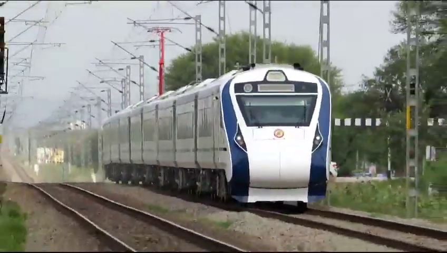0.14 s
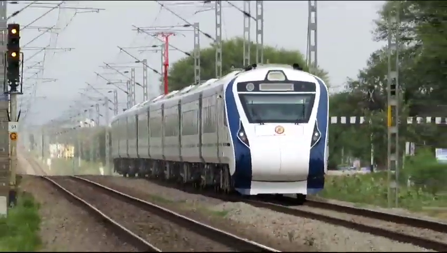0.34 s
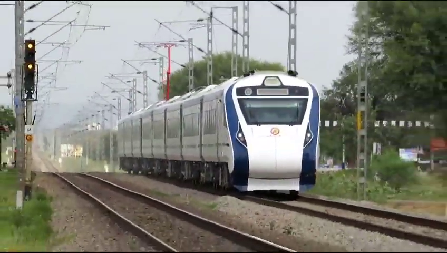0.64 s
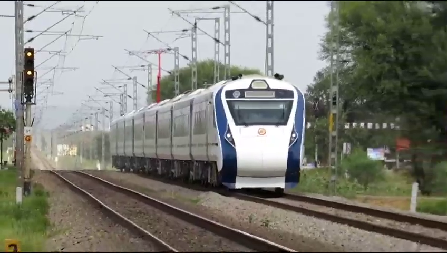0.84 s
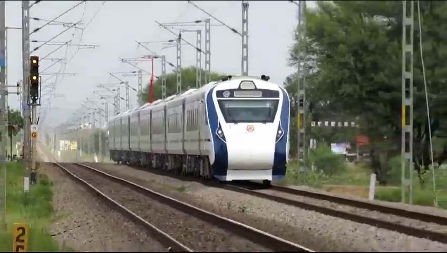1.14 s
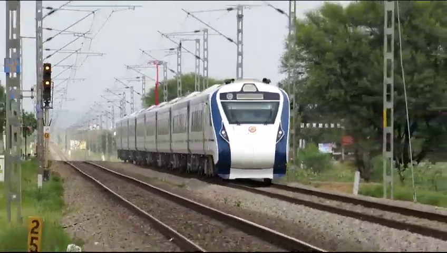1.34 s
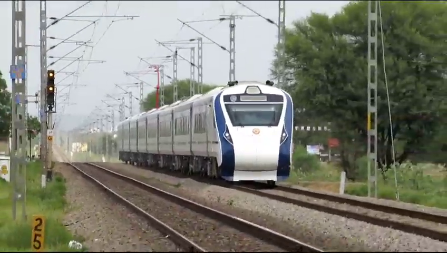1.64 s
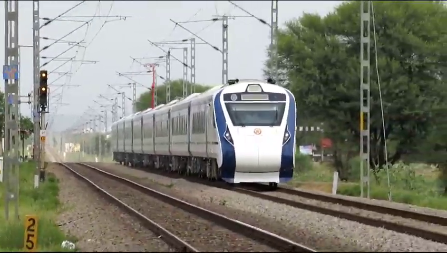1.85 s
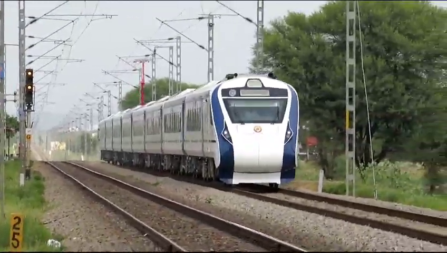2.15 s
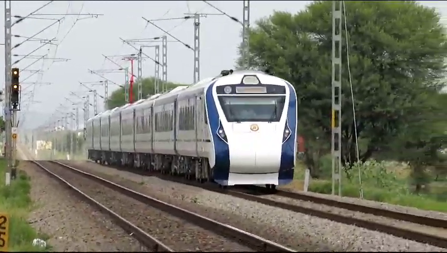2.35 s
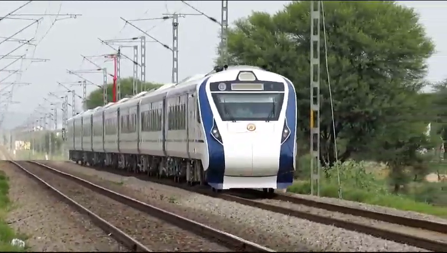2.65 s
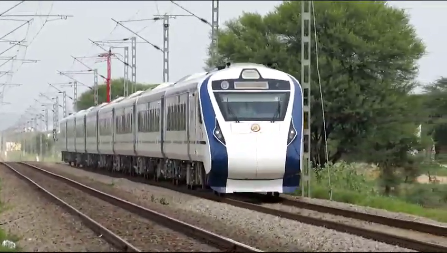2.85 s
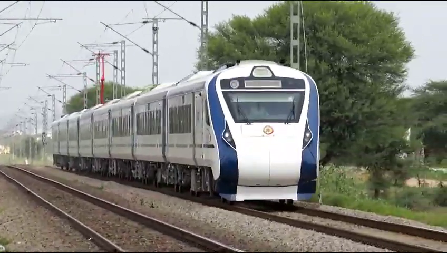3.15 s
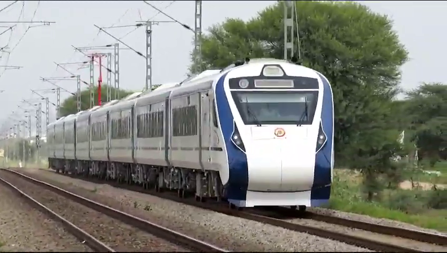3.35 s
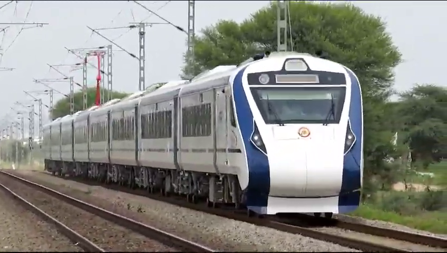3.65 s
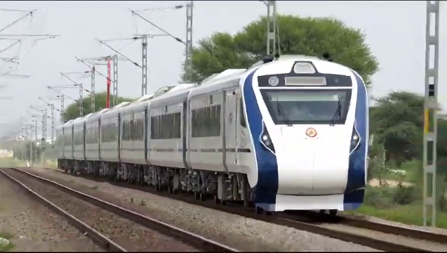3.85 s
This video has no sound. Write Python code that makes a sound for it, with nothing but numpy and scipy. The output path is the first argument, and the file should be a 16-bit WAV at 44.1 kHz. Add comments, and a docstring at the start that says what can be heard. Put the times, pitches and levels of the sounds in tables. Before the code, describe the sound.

A train horn blasts one steady high note from about two seconds to the end, after quieter ringing rails, soft rolling noise and wind buffets; open track outdoors, stereo microphone exposed to wind.

```python
"""One long air-horn note from a fast train approaching on open track: drifting, shimmering harmonics.
Masts beside the line return delayed copies that slide down in pitch as the train passes them.
The rails sing (noise through narrow resonances) over the coloured noise of rolling;
a far horn hums on two sines, gusts of low noise buffet two microphone ports, faint air noise lies below."""
import sys
import numpy as np
from scipy import signal
from scipy.fft import rfft, irfft
from scipy.io import wavfile

SR = 44100
rng = np.random.default_rng(int(sys.argv[2]) if len(sys.argv) > 2 else 0)


def nominal_scale(level):
    """Amplitude ratio for a level in decibels (scalar or array-like)."""
    x = np.asarray(level, float) / 20
    return 10 ** x


def transcribe(u):
    """Save the signal u as a 16-bit wav file named by the first command-line argument.

    u: samples, shape (n,) or (channels, n), limited to [-1, 1]; the rate is SR.
    q: integer samples, one column per channel.
    """
    v = np.clip(np.atleast_2d(u).T, -1, 1)
    q = np.round(v * 32767).astype(np.int16)
    wavfile.write(sys.argv[1], SR, q)


N = 176400

# horn pitch, high while the air pressure is low: time_s, pitch_hz
HORN_PITCH = [(2.05, 775), (2.07, 775), (2.1, 769.5), (2.13, 762.5), (2.17, 755.5), (2.22, 751.6),
              (2.32, 748.4), (2.5, 745.5), (2.9, 744.2), (3.3, 743.9), (3.7, 743.3), (3.8, 743.7),
              (3.85, 749.2), (3.9, 758), (3.94, 764), (3.99, 779)]
# horn's lower partials: time_s, partial_1_db, partial_2_db, partial_3_db, partial_4_db
HORN_LOWER = [(2.045, -39, -48, -61, -65), (2.065, -14, -43.5, -35.5, -43), (2.093, -14, -29, -23.5, -59),
              (2.115, -13.5, -26.5, -19.5, -38), (2.159, -16, -40, -17.5, -30.5),
              (2.197, -14.5, -29, -16.5, -46), (2.245, -15, -24, -21, -27), (2.337, -14, -20, -28.5, -30.5),
              (2.397, -11.5, -26, -25.5, -25), (2.429, -16.5, -24, -31, -21.5),
              (2.527, -13.5, -19, -23.5, -23), (2.653, -17.5, -24, -19, -23.5),
              (2.695, -16.5, -26.5, -21.5, -26), (2.771, -15.5, -19.5, -25.5, -25.5),
              (2.859, -15, -20, -21, -28), (2.907, -16.5, -20, -31, -30.5), (2.945, -20.5, -18, -24, -22),
              (2.989, -15, -19, -25, -27.5), (3.109, -18, -25, -21, -20.5), (3.239, -15, -27, -20.5, -26.5),
              (3.315, -14, -35, -32, -22.5), (3.397, -12.5, -25.5, -24, -21.5),
              (3.461, -10.5, -27, -34, -21), (3.537, -12, -24, -31, -29.5), (3.593, -13, -25, -40.5, -33),
              (3.625, -10, -19.5, -36, -40), (3.663, -10.5, -21, -26, -57), (3.739, -11.5, -18, -24, -22),
              (3.831, -14, -24, -19.5, -28.5), (3.917, -17.5, -28.5, -29.5, -28.5),
              (3.961, -23.5, -40, -29.5, -34), (3.995, -45, -47, -37, -47)]
# common level of the horn's upper partials: time_s, partials_5_to_9_db, partials_10_to_20_db
HORN_UPPER = [(2.045, -75, -83), (2.055, -52, -86), (2.115, -26, -45.5), (2.185, -30, -53),
              (2.201, -31.5, -53), (2.239, -28, -51), (2.255, -33, -49), (2.349, -29, -52),
              (2.397, -29, -47.5), (2.561, -35.5, -54), (2.593, -29, -49), (2.631, -34.5, -55.5),
              (2.739, -26, -47.5), (2.979, -31.5, -45), (3.043, -36, -47), (3.207, -27.5, -44),
              (3.223, -29, -47.5), (3.337, -32, -46), (3.429, -27, -38), (3.635, -29, -42.5),
              (3.723, -32.5, -48.5), (3.815, -26, -44), (3.859, -36, -56), (3.995, -42, -82)]
# upper partials relative to that level: multiple, relative_db
UPPER_PARTIALS = [(5, -4), (6, -7), (7, -6.5), (8, -15), (9, -15), (10, -5.5), (11, -6.5), (12, -14),
                  (13, -13.5), (14, -15), (15, -21.5), (16, -24.5), (17, -27), (18, -28.5), (19, -37),
                  (20, -36)]
# horn's stereo side: frequency_hz, side_re_mid_db
HORN_SIDE = [(700, -38), (1500, -24.5), (2300, -22), (4000, -19), (8000, -8.5), (14000, -9.5)]
WAVER_RATIO, WAVER_HZ = 0.00037, 19
SHIMMER_DB, SHIMMER_HZ, SHIMMER_EXPONENT = -24, 23.5, 0.78
FADING_DB, FADING_HZ = 4, 6.6
RELEASE_S, DULLING_DB_PER_S_PER_PARTIAL = 3.88, 22

# masts that the horn passes: pass_s, distance_from_track_m, echo_db
MASTS = [(2.33, 3.0, -30), (2.62, 5.1, -34.5), (2.97, 6.5, -29), (3.3, 3, -41)]
TRAIN_M_PER_S, SOUND_M_PER_S = 28, 343
CLUTTER_COUNT, CLUTTER_MIN_DB, NEAR_CUT_HZ = 12, -40, 1630
# trees and walls still ahead of the train
DISTANT_COUNT, DISTANT_MIN_DB, DISTANT_CUT_HZ = 8, -22, 6400
FALLOFF_EXPONENT, SCATTER_DB, SCATTER_HZ = 1.4, 5.5, 16

# singing rails: time_s, level_db
RAIL_LEVEL = [(0.0, -45.5), (0.32, -42), (0.39, -56), (0.42, -36.5), (0.47, -47), (0.52, -38), (0.54, -44),
              (0.63, -38.5), (0.77, -46.5), (0.78, -40), (1.01, -42), (1.04, -37.5), (1.2, -48.5),
              (1.24, -39.5), (1.36, -37.5), (1.4, -43.5), (1.7, -40.5), (1.76, -32), (1.93, -42),
              (1.96, -32), (2.03, -46.5), (2.07, -35.5), (2.15, -47.5), (2.36, -40), (2.75, -48),
              (2.78, -42), (2.99, -43), (3.06, -40.5), (3.46, -42), (3.54, -31.5), (3.58, -44), (3.65, -39),
              (3.68, -51), (4.0, -49)]
# rail resonances: centre_hz, width_hz, level_db
RAIL_MODES = [(1152.7, 22.3, -1.8), (1212.6, 34.5, -0.92), (1250, 67, -2.1), (1302.4, 29.3, -0.49)]
RAIL_FLICKER_DB, RAIL_FLICKER_HZ = 1.5, 37

# rolling noise, before the fixed gain: time_s, level_db
ROLL_LEVEL = [(0.0, -62.5), (0.23, -61.5), (0.38, -62), (0.7, -60.5), (1.02, -62.5), (1.17, -62),
              (1.74, -57), (1.94, -50.5), (2.36, -51.5), (3.07, -55), (3.58, -47.5), (4.0, -54)]
# rolling spectrum: frequency_hz, level_db
ROLL_COLOUR = [(500, -37), (650, -5), (850, 1), (1100, 5), (1400, -8), (2000, -12), (3500, -22),
               (7000, -39), (12000, -41)]
# rolling left-right likeness: frequency_hz, correlation
ROLL_ALIKE = [(500, 0.92), (3000, 0.78)]
ROLL_GAIN_DB, ROLL_FLICKER_DB, ROLL_FLICKER_HZ = 6.5, 1.2, 16

# far horn: time_s, level_db
FAR_HORN_LEVEL = [(.14, -92), (.2, -49.5), (.6, -46.5), (.72, -48), (.9, -46.5), (.96, -56.5), (1.2, -59),
                  (1.5, -57.5), (1.7, -88)]
# far horn's partials: frequency_hz, relative_db
FAR_PARTIALS = [(430.7, -1), (866.7, -9)]

# steady wind on the ports: time_s, level_db
WIND_LEVEL = [(0.0, -34.5), (0.44, -40), (0.79, -43.5), (0.92, -42), (1.24, -47.5), (1.58, -47.5),
              (1.9, -36), (2.27, -33.5), (2.37, -28), (2.65, -47), (2.9, -36.5), (3.01, -32), (3.77, -47),
              (4.0, -50)]
# wind spectrum: frequency_hz, level_db
WIND_COLOUR = [(12, -41), (20, -16), (51, 2), (103, 3), (225, -1), (433, -11.5), (528, -22), (567, -42),
               (600, -20.5), (780, -53), (1320, -120)]
# wind left-right likeness: frequency_hz, correlation
WIND_ALIKE = [(30, 1), (60, 0.93), (125, 1), (250, 0.87), (500, 0.44)]
WIND_SPLIT_HZ, PORTS_ALIKE_BELOW_HZ = 100, 90
LOW_LUMPS_DB, LOW_LUMPS_HZ, HIGH_LUMPS_DB, HIGH_LUMPS_HZ = 3, 8.3, 5, 20.4
# single buffets, before delay and trim: start_s, peak_db, centre_hz
BUFFETS = [(0.019, -17, 129), (0.089, -46, 120), (0.158, -20, 162), (0.254, -16, 137), (0.283, -28, 108),
           (0.3, -12, 207), (0.359, -30, 148), (0.423, -12, 236), (0.442, -17, 310), (0.531, -15, 250),
           (0.589, -25.5, 159), (0.637, -22, 157), (0.719, -49, 156), (0.818, -21.5, 121),
           (0.842, -26, 205), (0.976, -13, 226), (1.038, -22.5, 146), (1.191, -23, 228), (1.625, -23, 64),
           (1.764, -16, 194), (1.873, -18.5, 102), (1.96, -27, 64.6), (2.027, -26, 173), (2.1, -16.5, 99),
           (2.159, -25, 72.7), (2.208, -14.5, 112), (2.247, -18, 143), (2.284, -19, 117.3),
           (2.337, -19, 292), (2.374, -14.5, 214.3), (2.417, -13.5, 290), (2.488, -8, 115),
           (2.527, -12, 85), (2.598, -23, 72), (2.655, -11.5, 162.4), (2.81, -23, 115.3),
           (2.84, -14.5, 212), (2.958, -16, 179), (2.998, -8.5, 63), (3.038, -29, 76), (3.131, -31, 264),
           (3.208, -9, 122), (3.316, -26, 181.6), (3.543, -15, 130.4), (3.632, -19, 182.6),
           (3.757, -21.5, 304), (3.949, -26, 211), (3.98, -21.5, 186)]
BUFFET_DELAY_S, BUFFET_TRIM_DB = 0.0023, -2.5
BUFFET_RISE_S, BUFFET_FALL_S, BUFFET_TAIL_RATIO = 0.0061, 0.022, 0.56

# background air spectrum: frequency_hz, level_db
AIR_COLOUR = [(240, -47), (400, -14), (567, -19), (841, -50.5), (1270, -22.5), (1430, -10.5), (7240, -22),
              (10400, -31.5), (11600, -75), (15000, -74)]
# air left-right likeness: frequency_hz, correlation
AIR_ALIKE = [(60, 0.22), (180, 0.97), (540, 1), (1630, -0.38), (4900, -0.51), (14700, -0.27)]
AIR_DB = -56


def rms_one(x):
    """Scale to rms 1."""
    return x / np.sqrt(np.mean(x ** 2) + 1e-20)


def in_time(rows, before=None):
    """Columns of a time table at every sample; `before` applies ahead of the first row."""
    time_s, *columns = np.transpose(rows)
    return [np.interp(np.arange(N) / SR, time_s, column, left=before) for column in columns]


def at_hz(points, hz):
    """Read a two-column table on a log-frequency axis."""
    points_hz, values = np.transpose(points)
    return np.interp(np.log(hz), np.log(points_hz), values)


def drift(rate_hz):
    """Slow random curve of spread 1: twice-smoothed noise, computed every 40 samples."""
    pole = np.exp(-2 * np.pi * rate_hz * 40 / SR)
    noise = rng.standard_normal(N // 40 + 2002)
    slow = signal.lfilter([1], [1, -2 * pole, pole * pole], noise)[2000:]   # drop the run-in
    return np.interp(np.arange(N) / 40, np.arange(len(slow)), rms_one(slow))


def coloured(spectrum, likeness):
    """Stereo noise of rms 1, shaped in frequency; mid/side weights set the left-right correlation."""
    hz = np.maximum(np.arange(N // 2 + 1) * SR / N, 5)
    alike = np.clip(at_hz(likeness, hz), -1, 1)
    mid, side = rfft(rng.standard_normal((2, N))) * nominal_scale(at_hz(spectrum, hz))
    stereo = np.sqrt(1 + alike) * mid + np.sqrt(1 - alike) * side * [[1], [-1]]
    return rms_one(irfft(stereo, N))


def horn():
    """Harmonics of the diaphragm; turbulent air makes each shimmer, and the upper ones fade, on its own."""
    pitch_hz, = in_time(HORN_PITCH)
    levels_db = in_time(HORN_LOWER, before=-120)
    upper_db = in_time(HORN_UPPER, before=-120)
    for multiple, relative_db in UPPER_PARTIALS:
        fading_db = FADING_DB * np.minimum(drift(FADING_HZ), 1.5)
        group_db = upper_db[1 if multiple >= 10 else 0]
        levels_db.append(group_db + relative_db + fading_db)
    phase = 2 * np.pi * np.cumsum(pitch_hz * (1 + WAVER_RATIO * drift(WAVER_HZ))) / SR
    dulling_db = DULLING_DB_PER_S_PER_PARTIAL * np.maximum(np.arange(N) / SR - RELEASE_S, 0)
    mid, side = 0, 0
    for k, level_db in enumerate(levels_db, 1):
        angle = k * phase + 0.91 * drift(2.1)
        random_turn = drift(SHIMMER_HZ) + 1j * drift(SHIMMER_HZ)
        shimmer = nominal_scale(SHIMMER_DB) * k ** SHIMMER_EXPONENT * random_turn
        tone = np.sqrt(2) * nominal_scale(level_db - k * dulling_db) * (1 + shimmer) * np.exp(1j * angle)
        mid = mid + tone.imag
        # side: a quarter turn from mid, with wandering phase and level
        side_turn = 1j + 0.18 * drift(11) + 0.35j * drift(8.5) + 0.3 * drift(45) + 0.3j * drift(45)
        side_gain = nominal_scale(at_hz(HORN_SIDE, k * pitch_hz.mean()))
        side = side + side_gain * (tone * side_turn).imag
    return mid, side


def echoes(direct):
    """The detour via a reflector grows as the horn passes it, so its echo drops in pitch and fades;
    reflectors still ahead give echoes only slightly flat, which beat with the note."""
    # random reflectors: pass_s, distance_from_track_m, echo_db
    clutter = rng.random((CLUTTER_COUNT, 3)) * [2.2, 8, 6] + [1.7, 3, CLUTTER_MIN_DB]
    distant = rng.random((DISTANT_COUNT, 3)) * [2.5, 24, 6] + [5.2, 16, DISTANT_MIN_DB]
    near = list(MASTS) + list(clutter)
    t, out = np.arange(N) / SR, np.zeros((2, N))
    for reflectors, cut_hz in ((near, NEAR_CUT_HZ), (distant, DISTANT_CUT_HZ)):
        group = 0
        for pass_s, distance_m, echo_db in reflectors:
            past_m = TRAIN_M_PER_S * (t - pass_s)
            away_m = np.hypot(past_m, distance_m)
            echo = np.interp(t - (away_m + past_m) / SOUND_M_PER_S, t, direct)
            gain = nominal_scale(echo_db + SCATTER_DB * drift(SCATTER_HZ)) * (distance_m / away_m) ** FALLOFF_EXPONENT
            spread = rng.uniform(-1, 1)
            group = group + gain * echo * [[1], [spread]]
        out += signal.sosfilt(signal.butter(2, cut_hz, fs=SR, output="sos"), group)
    mid, spread = out
    return mid, np.gradient(spread)


def rails():
    """Wheel noise carried ahead in the rails rings in a few close resonances."""
    out = 0
    for centre_hz, width_hz, level_db in RAIL_MODES:
        edges_hz = [centre_hz - width_hz / 2, centre_hz + width_hz / 2]
        band = signal.butter(2, edges_hz, "band", fs=SR, output="sos")
        mid, side = signal.sosfilt(band, rng.standard_normal((2, N)))
        gain = nominal_scale(level_db + RAIL_FLICKER_DB * drift(RAIL_FLICKER_HZ))
        out = out + gain * (mid + nominal_scale(-10.5) * side * [[1], [-1]])
    return nominal_scale(in_time(RAIL_LEVEL)[0]) * rms_one(out)


def rolling():
    """Rolling noise of the train: coloured noise with a flickering level."""
    level_db = in_time(ROLL_LEVEL)[0] + ROLL_GAIN_DB
    flicker_db = ROLL_FLICKER_DB * drift(ROLL_FLICKER_HZ)
    return nominal_scale(level_db + flicker_db) * coloured(ROLL_COLOUR, ROLL_ALIKE)


def far_horn():
    """A faint note from far off: two sines of wandering level and phase."""
    t, note = np.arange(N) / SR, 0
    for hz, relative_db in FAR_PARTIALS:
        gain = nominal_scale(relative_db + 1.9 * drift(7.3))
        note = note + gain * np.sin(2 * np.pi * hz * t + 1.2 * drift(2.6))
    return np.sqrt(2) * nominal_scale(in_time(FAR_HORN_LEVEL)[0]) * note


def steady_wind():
    """Low noise on the ports, lows and highs lumping apart."""
    noise = coloured(WIND_COLOUR, WIND_ALIKE)
    lows = signal.sosfiltfilt(signal.butter(2, WIND_SPLIT_HZ, fs=SR, output="sos"), noise)
    highs = noise - lows
    lumpy_lows = lows * nominal_scale(LOW_LUMPS_DB * drift(LOW_LUMPS_HZ))
    lumpy_highs = highs * nominal_scale(HIGH_LUMPS_DB * drift(HIGH_LUMPS_HZ))
    return nominal_scale(in_time(WIND_LEVEL)[0]) * (lumpy_lows + lumpy_highs)


def buffets():
    """Single gusts: short noise bursts that swell and die, each in a band of its own."""
    noise, out = coloured(WIND_COLOUR, WIND_ALIKE), np.zeros((2, N))
    t = np.arange(SR // 8) / SR
    rise = t / BUFFET_RISE_S
    swell = (rise * np.exp(1 - rise)) ** 2
    tail = BUFFET_TAIL_RATIO * np.exp(-t / BUFFET_FALL_S) * (1 - np.exp(-rise))
    shape = swell + tail
    for start_s, peak_db, centre_hz in BUFFETS:
        i = int((start_s + BUFFET_DELAY_S) * SR)
        burst = noise[:, i:i + len(t)] * shape[:N - i]
        band = signal.butter(1, [centre_hz * 0.82, centre_hz * 2.05], "band", fs=SR, output="sos")
        puff = signal.sosfilt(band, burst)
        out[:, i:i + len(t)] += nominal_scale(peak_db + BUFFET_TRIM_DB) * puff / np.abs(puff).max()
    return out


def wind():
    """Steady wind and buffets; the left-right difference loses its lows, so the ports agree there."""
    out = steady_wind() + buffets()
    high_pass = signal.butter(2, PORTS_ALIKE_BELOW_HZ, "high", fs=SR, output="sos")
    difference = signal.sosfiltfilt(high_pass, out[0] - out[1])
    return out.mean(axis=0) + difference * [[0.5], [-0.5]]


def air():
    """Faint steady coloured noise."""
    return nominal_scale(AIR_DB) * coloured(AIR_COLOUR, AIR_ALIKE)


def scene():
    """Horn and echoes over rails, rolling, far horn, wind and air."""
    mid, side = horn()
    echo, echo_spread = echoes(mid)
    side = side + nominal_scale(4.5) * echo_spread
    note = mid + side * [[1], [-1]] + echo
    return note + rails() + rolling() + far_horn() + wind() + air()


def top_cut(x):
    """Nothing passes above the cut-off."""
    return signal.sosfilt(signal.butter(12, 15340, fs=SR, output="sos"), x)


def record(dry):
    """Finished stereo mix to output signal."""
    return top_cut(dry)


dry = scene()
out = record(dry)
transcribe(out)
```